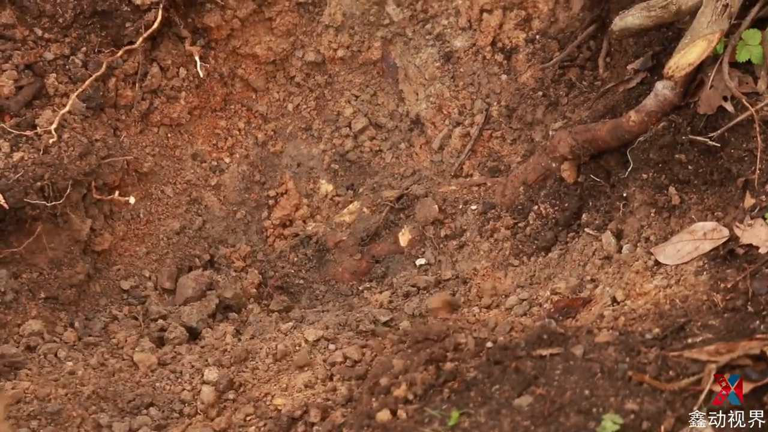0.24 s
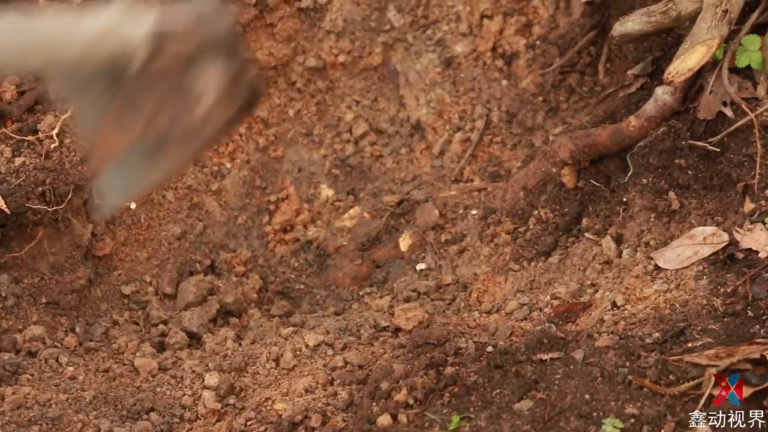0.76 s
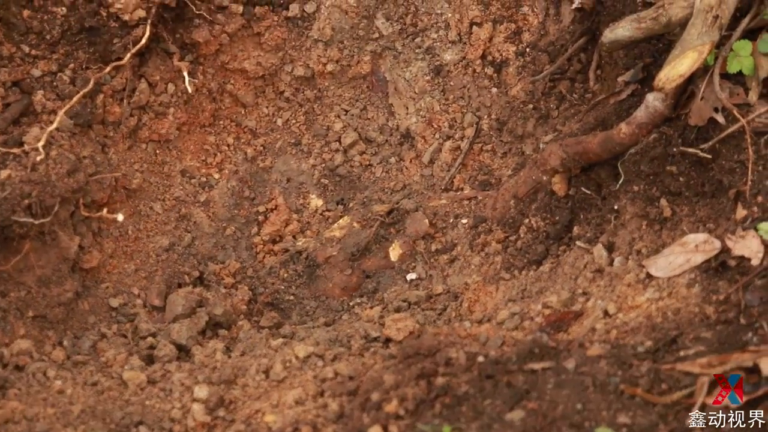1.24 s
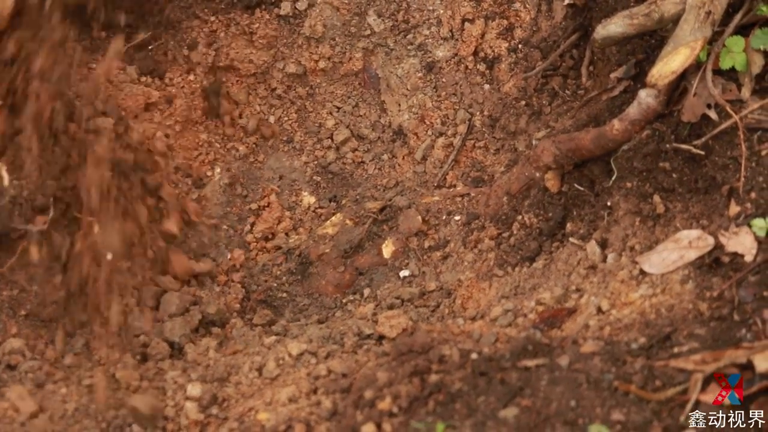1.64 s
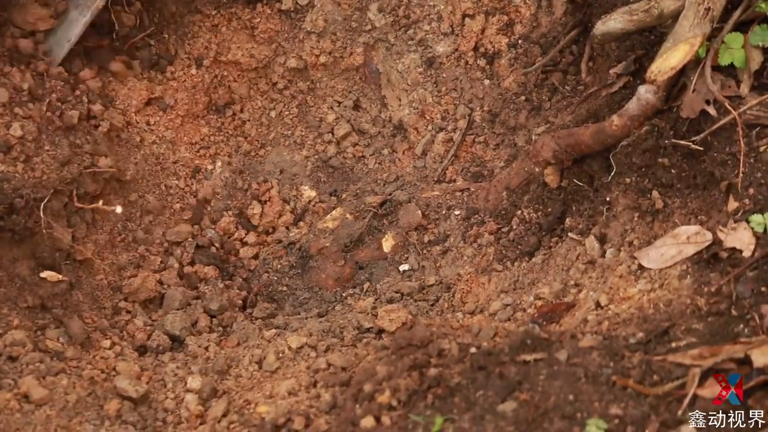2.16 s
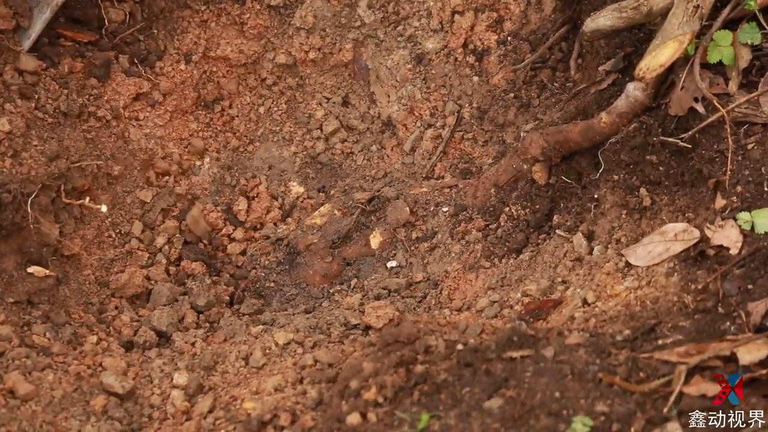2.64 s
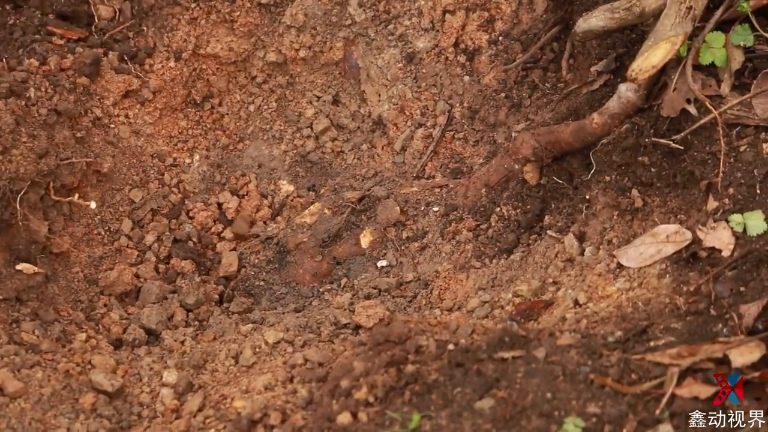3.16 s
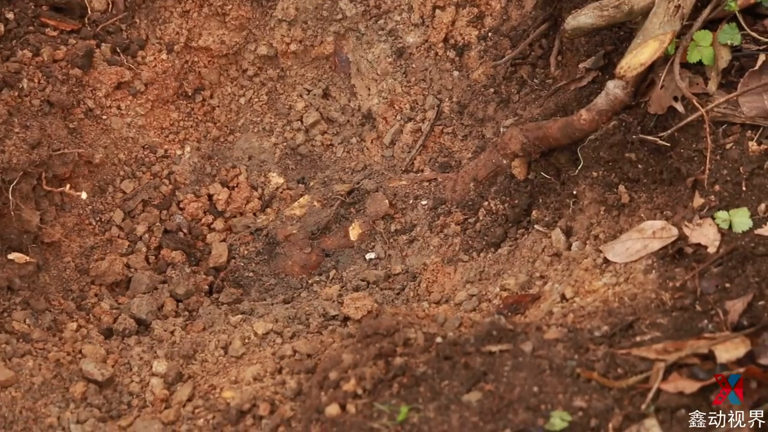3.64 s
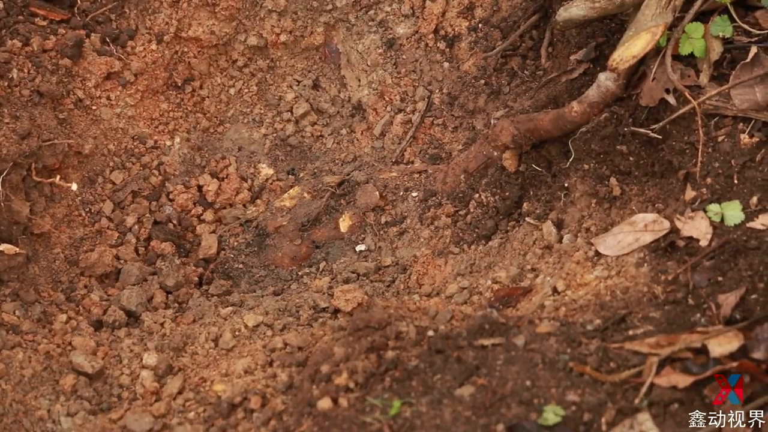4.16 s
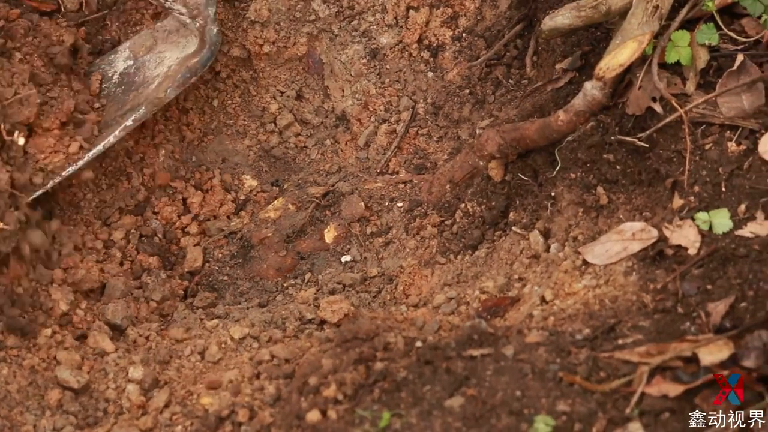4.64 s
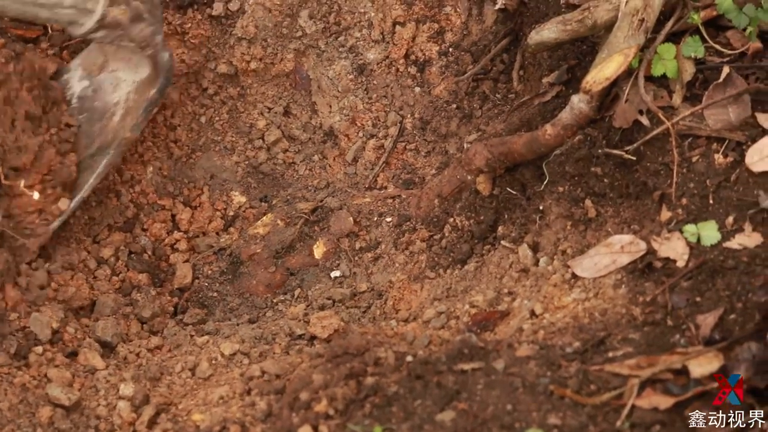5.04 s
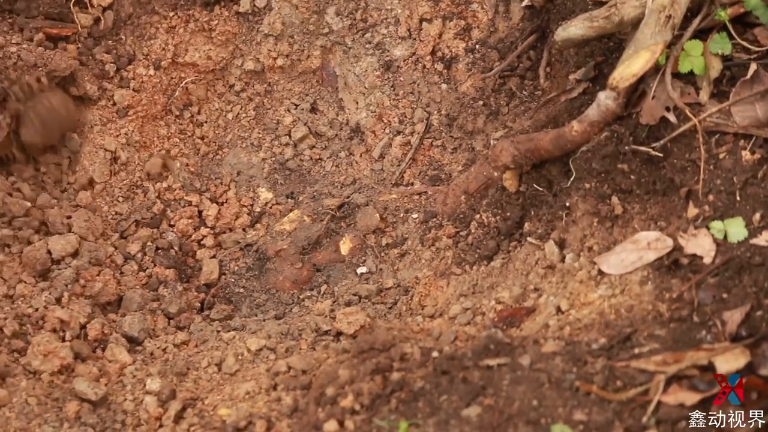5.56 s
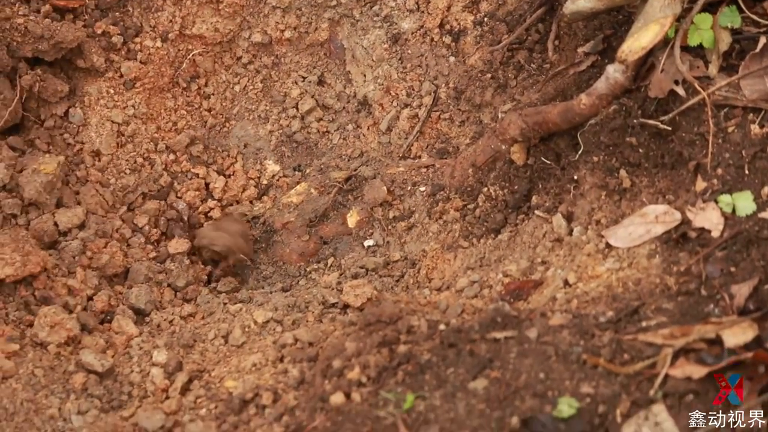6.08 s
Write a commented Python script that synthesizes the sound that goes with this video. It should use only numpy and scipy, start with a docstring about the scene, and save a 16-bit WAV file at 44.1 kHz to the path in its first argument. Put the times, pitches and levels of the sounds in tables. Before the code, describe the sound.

A steel hoe chops and scrapes through dry stony clay in uneven bouts, clods crumbling and pebbles ticking, heard very close outdoors.

```python
"""Outdoors on dry, stony clay: a steel hoe chops and drags, very close to one microphone.
Each chop is a burst of tiny fractures that rings the earth-damped blade and thuds in the ground.
Clods, pebbles and stone taps are shaped noise and impulses; crumbs and sand trickle as random ticks.
Low rumbles and faint air lie behind, with a very faint unrelated hiss, opposite in sign left and right.
The hardest blows overload the recorder."""
import sys
import numpy as np
from scipy import signal
from scipy.fft import rfft, irfft
from scipy.io import wavfile

SR = 44100
rng = np.random.default_rng(int(sys.argv[2]) if len(sys.argv) > 2 else 0)


def wav_record(signal):
    """Record a signal, one row per channel, as 16-bit PCM in the file named by sys.argv[1]."""
    frames = np.transpose(np.atleast_2d(signal))
    bounded = np.clip(frames, -1, 1)
    # unit amplitude maps onto the largest positive 16-bit level
    quanta = np.round(bounded * 32767).astype(np.int16)
    wavfile.write(sys.argv[1], SR, quanta)


N = 278359  # length [samples]

# Blade bites, the ring of the steel set for each; levels are set before the trims of chops():
# (time [s], swell [s], crunch [dB], thud re crunch [dB], grit re crunch [dB],
#  knock [Hz], crack [Hz], ring of the steel [dB])
BITES = [(0.063, 0.0021, -17.5, -6, -22, 907, 3950, -17), (0.083, 0.0014, -21, -8, -5, 1380, 4380, -8),
         (0.1682, 0.000086, -15.5, -37, -12.5, 1290, 4100, 23),
         (1.5177, 0.0016, -12, -18, 3, 1290, 2860, -27), (1.616, 0.0004, -12, -14.5, -5, 880, 3800, -9),
         (1.7, 0.00023, -22, -0.5, -7, 600, 1764, -7), (1.7051, 0.00026, -14, -5.5, 0, 1662, 2956, -16),
         (2.0835, 0.0059, -15, -6.5, -7.5, 683, 2920, 14), (2.105, 0.0051, -16.5, -11, -12, 744, 1430, 0),
         (2.117, 0.00035, -23, -4, 3, 660, 2940, 12), (2.4048, 0.00025, -20.5, 1, -6.5, 582, 3030, 7),
         (2.4085, 0.00046, -15, -2.5, -30, 576, 1717, -23), (2.747, 0.005, -18, 1, -9, 768, 2830, 24),
         (2.977, 0.0052, -20.5, -18, -3, 594, 2910, 10), (2.996, 0.0033, -15.5, -8, -28, 562, 1730, -13),
         (3.014, 0.0014, -15, -7.5, -9.5, 730, 2990, 3), (3.07, 0.0002, -14.5, -3.5, 0, 715, 1730, 2),
         (3.083, 0.0013, -15.5, -8, -7, 683, 1400, -22), (3.192, 0.000089, -20, -5, -38, 1230, 2700, 2),
         (3.2445, 0.00023, -25, 9, -49, 950, 1450, -7), (4.327, 0.00005, -9, -33, 4.5, 670, 2465, -8.5),
         (5.115, 0.00009, -17.5, -1.5, -40, 915, 3290, -6),
         (5.144, 0.0029, -15.5, -7, -33, 1180, 3260, -25), (5.156, 0.00016, -16, -9, -8, 980, 2180, -2),
         (5.2269, 0.0023, -13, -1, -32, 1120, 3700, 20), (5.241, 0.0011, -15.5, -17, -31, 1210, 3960, -7)]

THUD_TOP_HZ, GRIT_FROM_HZ = 1100, 5000  # borders of thud, crunch and grit
BLOW_S = 0.01  # reference length of a blow


def chops(knock_db=0, knock_floor_db=-10, knock_breadth=0.086, crack_db=-2, crack_breadth=0.05,
          crunch_db=-3, thud_db=-3.5, grit_db=-3, grit_decay=0.55, lowest_per_knock=0.36, hold_s=0.00099):
    """Pressure builds until the crust breaks; fractures die away, the clod knocks low and cracks."""
    bite_t60_s, t60_per_swell = 0.021, 1.4  # a bite that builds slowly also dies away slowly
    out, lead = np.zeros(N), 3 * BLOW_S
    t = np.arange(SR // 8) / SR - lead  # zero when the crust breaks
    for s, swell, db, thud_rel, grit_rel, knock_hz, crack_hz, steel_db in BITES:
        t60 = bite_t60_s + t60_per_swell * swell
        fade = np.where(t < 0, t / swell, -np.log(1000) * np.maximum(t - hold_s, 0) / t60)
        fractures = cracks(len(t), 26000, 5.3)
        force = fractures * np.exp(fade)
        thud, crunch, _ = registers(blade(fragments(force), steel_db=steel_db))

        # grit rises and dies faster than the rest
        brief_force = fractures * np.exp(fade / grit_decay)
        _, _, grit = registers(blade(fragments(brief_force), steel_db=steel_db))

        body = resonate(force, knock_hz, knock_breadth * knock_hz)
        thud, body = cut([thud, body], lowest_per_knock * knock_hz, "high", order=3)
        knock = (undb(thud_rel + knock_db) + undb(knock_floor_db)) * blow(body)
        crack = undb(crack_db) * blow(resonate(force, crack_hz, crack_breadth * crack_hz))
        low = undb(thud_rel + thud_db) * blow(thud)
        middle = undb(crunch_db) * blow(crunch)
        high = undb(grit_rel + grit_db) * blow(grit)
        add(out, s - lead, undb(db) * (low + knock + crack + middle + high))
    return out


def cracks(size, per_s, spread_db):
    """Randomly timed fractures: many small, a few large."""
    strength = undb(spread_db * np.minimum(rng.exponential(size=size), 5))
    happens = rng.random(size) < per_s / SR
    return unit(happens * rng.standard_normal(size) * strength + 1e-9)


def fragments(force, width_hz=80, ring_db=1, count=16):
    """Every bite breaks loose different stones, which ring at their own pitches."""
    pitches = 2000 + 12000 * (np.arange(count) + rng.random(count)) / count
    rings = sum((-1) ** k * resonate(force, hz, width_hz) for k, hz in enumerate(pitches))
    return force + undb(ring_db) * rings


def blade(force, direct_db=-13, dull_hz=7500, steel_db=0):
    """Fractures heard directly and through the buried blade, gripped differently by soil each time."""
    grip_detune = 0.014  # largest share by which packed soil raises the modes
    ring = steel(force, damping_hz=83, stretch=1 + grip_detune * rng.random())
    direct = cut(cut(force, dull_hz, "low", order=1), 190, "high")
    return undb(steel_db) * ring + undb(direct_db) * direct


def steel(force, damping_hz=0, stretch=1):
    """The blade's modes; pressing earth raises them slightly, widens and shortens them."""
    # modes of the hoe when free of the soil: (frequency [Hz], level [dB], t60 [s])
    modes = [(747, 13.5, 0.02), (893, 3, 0.041), (1208, 5.5, 0.036), (1389, 3.5, 0.22), (1770, 15, 0.0047),
             (2600, 14.5, 0.0056), (2945, 4, 0.2), (4500, 6, 0.1), (5720, -3, 0.1), (3010, 8.5, 0.0075),
             (4100, 5.5, 0.03), (6320, 8.5, 0.017), (6855, 0, 0.031), (8130, 8, 0.025)]
    hz, db, t60 = np.transpose(modes)
    widths = np.log(1000) / (np.pi * t60) + damping_hz
    gains = undb(db) * widths.mean() / widths
    return sum(gain * resonate(force, f, width) for f, width, gain in zip(hz * stretch, widths, gains))


def registers(x):
    """Split earth noise into thud, crunch and grit."""
    thud = cut(x, THUD_TOP_HZ, "low", order=4)
    crunch = cut(x, [THUD_TOP_HZ, GRIT_FROM_HZ], "band", order=3)
    grit = cut(x, GRIT_FROM_HZ, "high", order=5)
    return thud, crunch, grit


def drags(level_db=-4, grit_db=-7.0, grit_slope=0.44, rasp_db=-2, rasp_width_hz=240,
          judder_db=4.5, slips_per_s=280, lowest_hz=170):
    """The edge sticks and slips through packed grit, rasping at a pitch of its own on each pull."""
    # blade dragged through earth; the crunch is set before level_db:
    # (start [s], end [s], crunch [dB], thud re crunch [dB], ring of the steel [dB], rasp of the edge [Hz])
    pulls = [(0, 0.106, -23, -11, 8, 4110), (0.135, 0.239, -30, -33, 17, 4260),
             (1.497, 1.532, -23.5, -8.5, -46, 2550), (2.061, 2.123, -23, 3, 3, 2920),
             (2.728, 2.788, -33.5, 1, -15, 810), (2.959, 3.032, -29.5, 7, 15, 2980),
             (3.208, 3.247, -25.5, -7, -6, 1700), (3.239, 3.297, -35, 3.5, 11, 1010),
             (5.11, 5.253, -33, 1.5, 6, 1010), (4.656, 4.747, -42, -11.5, -26, 2580),
             (5.422, 5.485, -33, -5.5, 11, 3000)]
    rise_s, release_s = 0.0066, 0.011
    out = np.zeros(N)
    for start, end, db, thud_rel, steel_db, rasp_hz in pulls:
        length = end - start
        t = np.arange(int((max(length, BLOW_S) + 2 * BLOW_S) * SR)) / SR
        contact = np.clip(t / rise_s, 0, 1) * np.exp(-np.maximum(t - length, 0) / release_s)
        judder = undb(judder_db * waver(len(t), slips_per_s))
        force = cracks(len(t), 6000, 2.8) * contact * judder
        scraping = cut(blade(fragments(force), steel_db=steel_db), lowest_hz, "high")
        thud, crunch, grit = registers(scraping)
        rasp = undb(rasp_db) * unit(resonate(force, rasp_hz, rasp_width_hz))
        sharpness = (rasp_hz / GRIT_FROM_HZ) ** grit_slope  # a higher rasp comes with more fine grit
        fine = undb(grit_db) * sharpness * unit(grit)
        pull = unit(crunch) + undb(thud_rel) * unit(thud) + fine + rasp
        add(out, start, undb(db + level_db) * pull)
    return out


def waver(size, per_s):
    """Random values joined by straight lines."""
    steps = np.arange(size) * per_s / SR
    values = rng.standard_normal(int(steps[-1]) + 2)
    return np.interp(steps, np.arange(len(values)), values)


def clods(swell_s=0.0016, crumble_s=0.0057, breadth=1.0, steel_db=3, spread_db=3.0):
    """A clod gives way gradually: its fractures thicken, then die out over the blade."""
    # soft clods crumbling as they land: (time [s], level [dB], centre [Hz])
    landings = [(0.024, -20.5, 3600), (0.147, -25.5, 4350), (0.195, -22.5, 4310), (0.214, -23.5, 4130),
                (0.281, -22.5, 3320), (0.415, -23, 1400), (0.457, -34, 1900), (0.496, -33.5, 1480),
                (0.5137, -30, 4000), (1.6698, -31, 1480), (2.202, -29.5, 3000), (2.34, -29, 4100),
                (2.775, -28, 2000), (3.275, -23, 1000), (3.5434, -30.5, 1450), (4.609, -36, 2770),
                (4.665, -30.5, 2190), (4.772, -34.5, 2550), (4.973, -40, 1430), (5.208, -21, 1030),
                (5.5766, -25.5, 3500), (5.61, -25, 2900), (5.7214, -34, 3450)]
    out, lead = np.zeros(N), 2 * BLOW_S
    t = np.arange(SR // 10) / SR - lead
    for s, db, hz in landings:
        force = cracks(len(t), 12000, spread_db) * np.exp(np.minimum(t / swell_s, -t / crumble_s))
        crumbling = resonate(blade(force, steel_db=steel_db), hz, breadth * hz)
        add(out, s - lead, undb(db) * blow(crumbling))
    return out


def pebbles(contact_cycles=2.9, breadth=0.7, light_hz=3800):
    """A hard pebble ticks once: the smaller, the brighter, briefer and less coloured by the blade."""
    # hard pebbles striking: (time [s], level [dB], centre [Hz])
    strikes = [(0.182, -23, 4000), (0.236, -31, 4020), (0.5905, -35.5, 7900), (0.9845, -43, 9850),
               (1.0206, -43, 9000), (1.354, -40.5, 1800), (1.808, -34, 4960), (1.825, -36, 4750),
               (2.0235, -37, 1960), (2.7223, -30.5, 1940), (2.79, -26, 2250), (2.826, -29, 1100),
               (2.8415, -26.5, 1760), (2.8515, -28.5, 1460), (3.046, -29.5, 3000), (3.227, -19.5, 1650),
               (4.412, -54, 4000), (4.4875, -33.5, 4170), (4.5665, -27, 2070), (4.763, -35, 2450),
               (5.1725, -24.5, 1450), (5.1825, -23, 2950), (5.3465, -30.5, 2800), (5.3559, -25.5, 3050)]
    out, t = np.zeros(N), np.arange(SR // 10) / SR
    for s, db, hz in strikes:
        force = rng.standard_normal(len(t)) * np.exp(-t * hz / contact_cycles)
        tick = blade(force) + (hz / light_hz) ** 2 * force
        add(out, s, undb(db) * blow(resonate(tick, hz, breadth * hz)))
    return out


def clinks(tick_db=-2.5, ring_db=2.5, contact_hz=4200):
    """A hard tick on stone, then the lifted blade rings freely."""
    # the blade taps a stone; level ahead of tick_db and ring_db: (time [s], level [dB])
    taps = [(0.704, -42), (0.7371, -28.5)]
    out, t = np.zeros(N), np.arange(SR // 3) / SR
    for s, db in taps:
        tick = cut(blade(rng.standard_normal(len(t)) * np.exp(-t / 0.0015)), contact_hz, "low")
        ring = resonate(steel(signal.unit_impulse(len(t))), contact_hz, contact_hz)
        add(out, s, undb(db) * (undb(tick_db) * blow(tick) + undb(ring_db) * blow(ring)))
    return out


def trickle(crumb_db=-1, lump_db=-5.5, sand_db=0, rub_db=1, crumble_s=0.0051, tumbles_per_s=110):
    """Lumps roll, crumbs patter in spurts and rub over the blade, fine sand ticks down the bank."""
    crumb_gain, lump_gain, sand_gain = flow()
    patter = unit(cut(grains(N, 2400, 2.3, cycles=10.3), 6700, "low", order=1))
    rubbing = unit(blade(cracks(N, 2500, 1.12)))
    spurts = tumbles(tumbles_per_s, crumble_s, steady=1.1)
    lumps, crumbs, grit = registers((patter + undb(rub_db) * rubbing) * spurts)
    sand = unit(cut(cracks(N, 3000, 2.3), [GRIT_FROM_HZ, 13000], "band", order=1))
    fine = unit(unit(grit) + undb(1.5) * sand)
    rolling = undb(lump_db) * lump_gain * unit(lumps)
    pattering = undb(crumb_db) * crumb_gain * unit(crumbs)
    return rolling + pattering + undb(sand_db) * sand_gain * fine


def flow():
    """Gains of crumbs, lumps and sand: slides start fast, thin, then settle; each bite spills crumbs."""
    # loosened earth slides down the bank; levels at the start, before the trims of trickle():
    # (start [s], length [s], crumbs [dB], lumps re crumbs [dB], sand re crumbs [dB])
    slides = [(0, 0.32, -28.5, -6.5, -15.5), (0.37, 0.5, -39.5, -2, -10), (0.773, 0.86, -50.5, 1, -3),
              (1.143, 0.09, -44, 7.5, -17), (1.533, 0.19, -39, -3, -9), (1.845, 1, -48.5, -1, -2.5),
              (2.999, 0.37, -40.5, 0, -9.5), (3.41, 0.41, -40.5, -3.5, -11), (3.814, 0.12, -50.5, -21, 2.5),
              (4.47, 0.19, -36.5, -4.5, -16.5), (4.771, 0.67, -43, -11, -9.5), (5.198, 0.2, -32, -6, -14.5),
              (5.492, 0.3, -34.5, -3, -10), (5.762, 0.31, -43, -3.5, -8.5)]
    rise_s, sag_db_per_s, settle_db_per_s = 0.056, 22.5, 140
    spill_db, spill_db_per_s = -33.5, 99  # crumbs shaken loose, re the bite's crunch; their decay
    power = np.zeros((3, N))
    t = np.arange(SR) / SR
    for s, length, db, lumps_rel, sand_rel in slides:
        fall_db = sag_db_per_s * t + settle_db_per_s * np.maximum(t - length, 0)
        gain = np.minimum(t / rise_s, 1) * undb(db - fall_db)
        for track, rel in zip(power, (0, lumps_rel, sand_rel)):
            add(track, s, (gain * undb(rel)) ** 2)
    for s, _, db, *_ in BITES:
        add(power[0], s, undb(db + spill_db - spill_db_per_s * t) ** 2)
    return np.sqrt(power)


def grains(size, per_s, spread_db, cycles):
    """Tiny stones colliding: each gives a tick and rings briefly at its own pitch."""
    when, pitch, chance = rng.random((int(per_s * size / SR) + 1, 3)).T[:, :, None]
    hz, t = 400 * 35 ** pitch, np.arange(200)  # t in samples
    strength = undb(spread_db * np.minimum(-np.log(1 - chance), 4)) * hz ** 0.75
    rings = strength * np.exp(-t * hz / SR / cycles) * np.cos(2 * np.pi * hz * t / SR)
    places = (when * size).astype(int) + t
    return unit(np.bincount(places.ravel(), rings.ravel(), size)[:size])


def tumbles(per_s, crumble_s, steady):
    """Lumps tip over at random: each starts a dying spurt of crumbs, over a steady share."""
    starts = np.abs(cracks(N, per_s, 0))
    spurts = signal.lfilter([1], [1, -np.exp(-1 / (crumble_s * SR))], starts)
    return unit(steady + unit(spurts))


def bumps(breadth=0.84):
    """Deep thumps and soft swells of low rumble: noise under a smooth hump, resonated twice."""
    # thumps and rumbles in the ground: (middle of the push [s], length [s], centre [Hz], level [dB])
    thumps = [(0.073, 0.064, 238, -42.5), (3.624, 0.62, 95, -70), (4.227, 0.4, 177.5, -57.5),
              (4.329, 0.01553, 254, -32.5), (4.329, 0.014, 81, -38), (4.979, 0.026, 83, -42)]
    out = np.zeros(N)
    for s, length, hz, db in thumps:
        push = np.hanning(int(length * SR))
        push = np.pad(push * rng.standard_normal(len(push)), (0, len(push)))  # room to ring out
        rumble = resonate(resonate(push, hz, breadth * hz), hz, breadth * hz)
        add(out, s - length / 2, undb(db) * unit(rumble))
    return out


def faint_noise(level_db=-54):
    """Even noise shaped in frequency: the outdoor air, and the spectrum of the fainter side hiss."""
    # spectrum before scaling to level_db: (frequency [Hz], relative density [dB per Hz])
    spectrum = [(18, -49), (30, -18), (75, -8.5), (337, -0.5), (698, -6), (1200, -9.5), (13500, -17.5),
                (15000, -32)]
    hz, db = np.transpose(spectrum)
    gain = undb(np.interp(np.log(np.fft.rfftfreq(N, 1 / SR) + 1), np.log(hz), db))
    return undb(level_db) * unit(irfft(rfft(rng.standard_normal(N)) * gain, N))


def undb(db):
    """Decibels to amplitude."""
    return 10 ** (np.asarray(db) / 20)


def unit(x):
    """Scale to rms 1."""
    return x / np.sqrt(np.mean(x ** 2))


def blow(x):
    """Scale a short sound to the energy of rms 1 held for one blow."""
    return x / np.sqrt(np.sum(x ** 2) / (BLOW_S * SR))


def add(track, s, x):
    """Mix x into the track from time s on."""
    i = int(s * SR)
    a, b = max(i, 0), min(i + len(x), N)
    track[a:b] += x[a - i:b - i]


def cut(x, hz, kind, order=2):
    """Butterworth filter."""
    sos = signal.butter(order, np.minimum(hz, SR / 2.1), kind, fs=SR, output="sos")
    return signal.sosfilt(sos, x)


def resonate(x, hz, width_hz):
    """One resonance, gain 1 at its centre."""
    b, a = signal.iirpeak(min(hz, SR / 2.2), hz / min(width_hz, SR / 4), fs=SR)
    return signal.lfilter(b, a, x + 1e-18)


def scene():
    """Hoe, earth and faint air in the middle, with a very faint hiss of opposite sign left and right."""
    hoe = chops() + drags() + clods() + pebbles() + clinks()
    air = faint_noise()
    mono = hoe + trickle() + bumps() + air
    hiss = undb(-16.5) * faint_noise()  # drawn afresh, unrelated to the air
    return mono + hiss * np.array([[1], [-1]])


def record(dry):
    """The hardest blows clip at full scale; the top is cut."""
    top_hz = 15900
    clipped = np.clip(dry, -1, 1)
    return signal.sosfilt(signal.ellip(10, 0.2, 80, top_hz, fs=SR, output="sos"), clipped)


dry = scene()
out = record(dry)
wav_record(out)
```